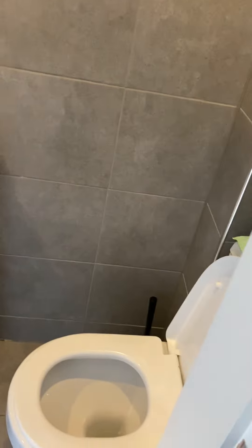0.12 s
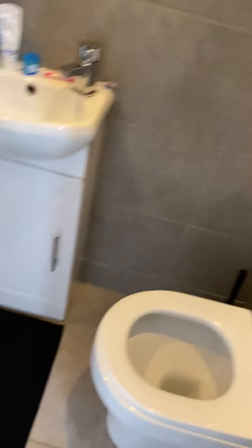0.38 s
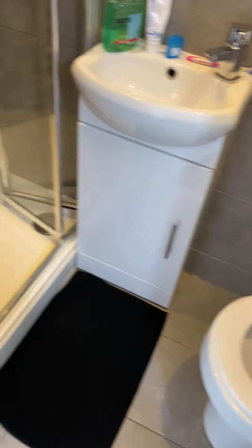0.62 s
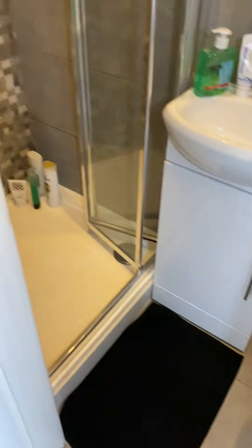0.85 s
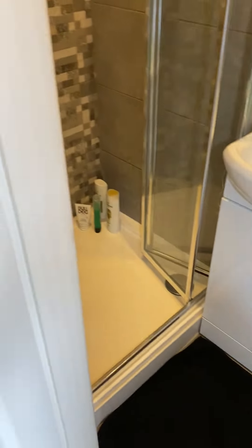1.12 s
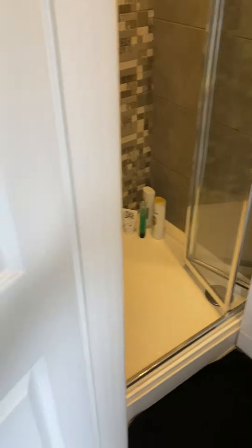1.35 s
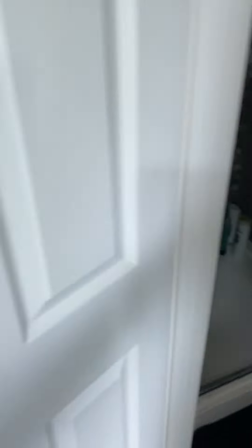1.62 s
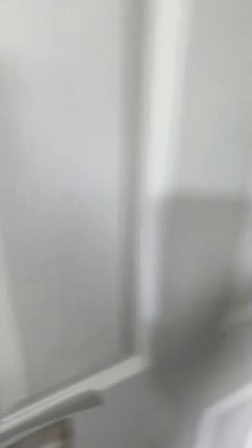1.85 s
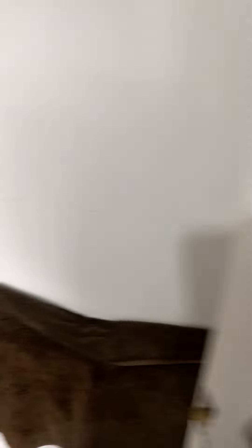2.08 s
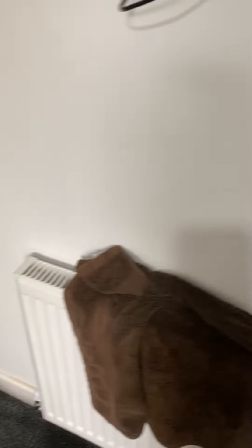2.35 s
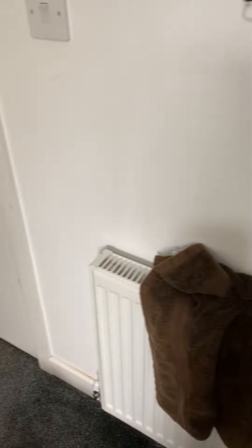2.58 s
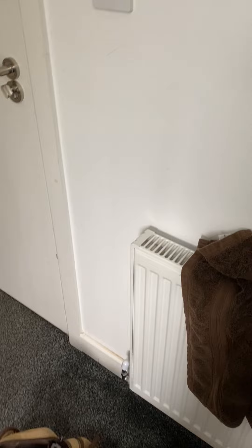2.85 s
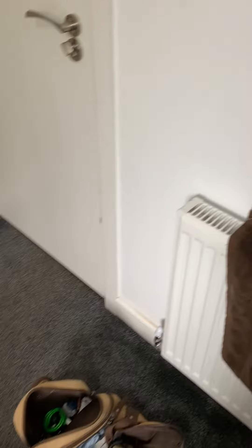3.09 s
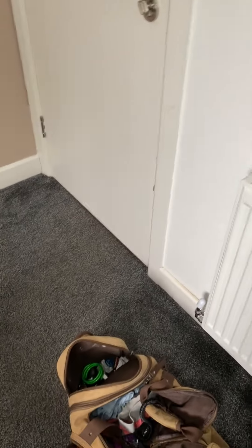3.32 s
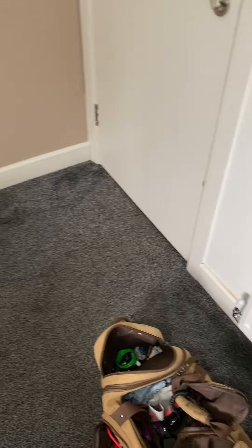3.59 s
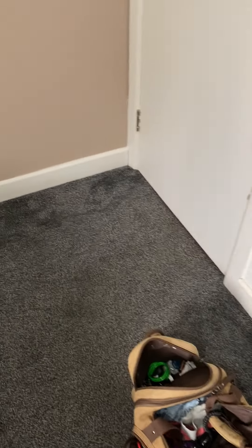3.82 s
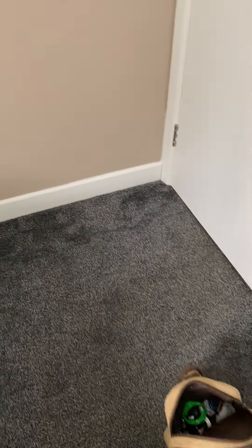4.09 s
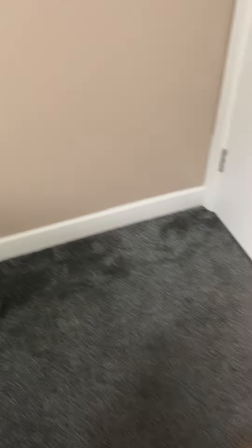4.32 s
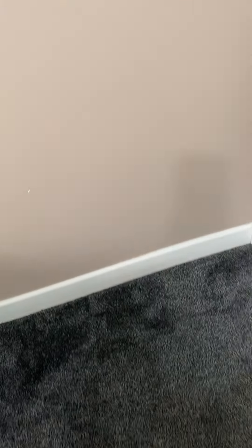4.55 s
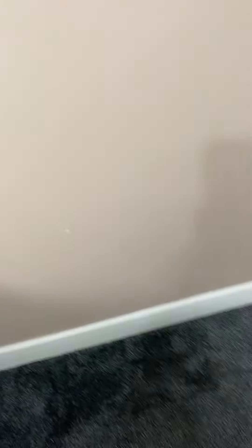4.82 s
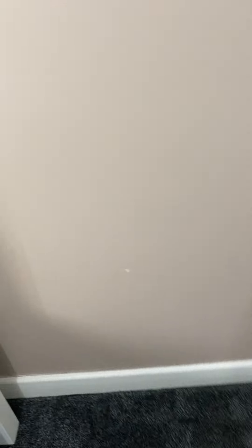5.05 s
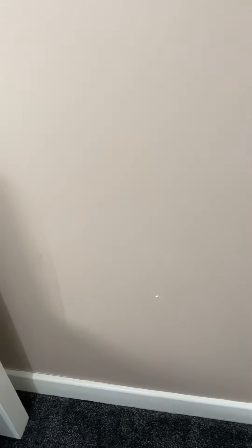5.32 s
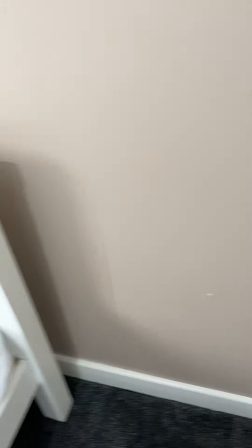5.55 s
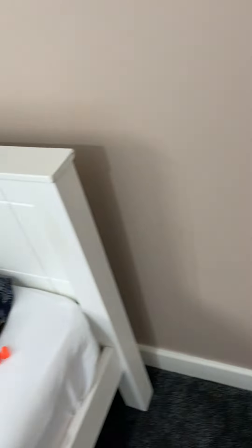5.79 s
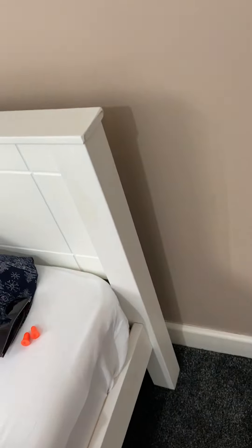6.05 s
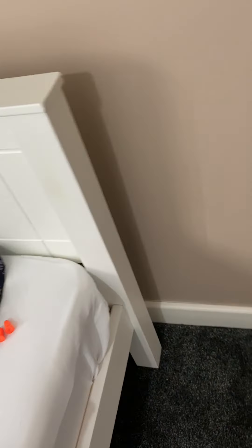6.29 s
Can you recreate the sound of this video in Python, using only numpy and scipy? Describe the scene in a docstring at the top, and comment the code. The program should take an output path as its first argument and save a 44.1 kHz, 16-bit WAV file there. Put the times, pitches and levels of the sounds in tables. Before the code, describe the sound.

A quiet indoor space with soft air hiss and a very faint rapid ticking from the lens motor, running in short spells. Tiny clicks and soft taps occur around 0.3-0.7 s. At 1.47 s a bright, dry switch click snaps out. From 2.05 s a panel door closes: a quick cluster of metallic latch clacks, a loud hollow wooden slam at 2.14, then deep dull thumps at 2.23, 2.31 and 2.40 with brief rattling. It settles into low floor rumble, faint cloth and a weak tap near 3.0. At 3.73 a latch clicks over a low thump, and at 3.90 a second heavy slam booms with a sharp clack, the low end fading past 4 s. Muffled footsteps thud around 4.9, 5.75 and 5.82. Small clicks, light knocks and short sole scrapes cluster at 5.25-5.5 and 6.26-6.4. Close stereo microphone, short room tail.

```python
"""Light switch, panel door and footsteps in a quiet house

A light switch clicks, a panel door is latched and slammed twice, and feet thud on boards under carpet.
Hard contacts are noise bursts that excite latch and door modes; soft blows swell into low floor booms.
Filtered noise gives the rattle, the shifting boards, the cloth, the dragged soles and the air.
A lens motor ticks inside the phone; a decaying noise tail is the room, heard at two microphone ports."""
import sys
import numpy as np
from scipy import signal
from scipy.fft import rfft, irfft, next_fast_len
from scipy.io import wavfile
from scipy.ndimage import uniform_filter1d, minimum_filter1d

SR = 44100
rng = np.random.default_rng(int(sys.argv[2]) if len(sys.argv) > 2 else 0)


def persist_wave(psi):
    """Save psi, clipped to +-1, as 16-bit WAV."""
    counts = np.round(np.clip(psi, -1, 1) * 32767).astype(np.int16)
    wavfile.write(sys.argv[1], SR, np.atleast_2d(counts).T)


def ratio(d):
    """dB to gain"""
    e = np.asarray(d, float) / 20
    return 10 ** e


N = 283122
T = np.arange(N) / SR  # time [s]

# Source levels are stated ahead of the microphone response and the limiter.
# Small hard parts (switch, latch, handle, buckles):
# (time [s], peak level [dB], colour [Hz], crack level re click [dB], chatter decay [s])
HARD_CONTACTS = [(.341, -45, 5800, -10, 0.0045), (.355, -38.5, 6050, -6, 0.0033),
                 (0.426, -44.5, 2000, 1.5, 0.0012), (1.202, -51, 3100, 8, 0.0032),
                 (1.446, -49, 2560, -22.5, 0.0071), (1.4703, -7.5, 3070, 2, 0.0036),
                 (1.4745, -23, 2300, -6, 0.0015), (1.874, -44, 5700, 6, 0.0011),
                 (2.046, -43, 2399, -1.5, 0.014), (2.062, -8.5, 1350, -0.5, 0.0032),
                 (2.079, -10.5, 1240, -3.5, 0.0043), (2.092, -11.5, 2540, 2.5, 0.0023),
                 (2.135, -6.5, 1217, -23, .005), (3.371, -41.5, 3140, 6, .005),
                 (3.642, -48, 2016, -4.5, 0.018), (3.7298, -21, 2760, 1.5, 0.0029),
                 (3.759, -28.5, 2670, -26, 0.0037), (3.885, -34, 2800, -6, .012),
                 (3.901, -7.5, 2730, 0.5, 0.0038), (3.918, -12, 2830, 1.5, 0.0093),
                 (4.32, -41.5, 2200, 10, 0.0015), (4.382, -46.5, 3800, 0.5, 0.013),
                 (4.907, -44, 5450, 6.5, .0028), (5.007, -37.5, 3350, 8.5, 0.0051),
                 (5.235, -43, 4190, -9.5, .0064), (5.255, -36.5, 6300, -4, .0043),
                 (5.371, -22, 2200, 5.5, 0.0033), (5.386, -36, 1490, -9, 0.006),
                 (5.455, -38, 5500, 7, 0.0057), (5.465, -28.5, 1765, -1.5, 0.0033),
                 (6.263, -24.5, 1730, -6.5, 0.0046), (6.272, -36.5, 4900, -29, 0.021),
                 (6.298, -37.5, 2620, -11, .004), (6.35, -37.5, 2640, -12, 0.0042)]
# Blows on door panels and furniture: (time [s], peak level [dB], hardness [Hz], chatter decay [s])
PANEL_KNOCKS = [(1.474, -28.5, 1150, .008), (2.07, -20.5, 420, 0.033), (2.134, -8, 1140, 0.0021),
                (2.14, -5, 537, 0.0028), (2.24, -28, 500, 0.018), (2.31, -25, 610, 0.0078),
                (2.399, -39, 500, 0.0083), (3.008, -41.5, 640, 0.0013), (3.734, -23.5, 356, 0.017),
                (3.904, -7.5, 716, 0.0014), (3.915, -9.5, 374, 0.021), (5.011, -49, 399.4, 0.0087),
                (5.284, -37.5, 910, 0.0024), (5.318, -35, 580, .007), (5.349, -36, 570, 0.0075),
                (5.473, -30.5, 560, 0.0036), (5.661, -44, 368, .02), (5.722, -49.5, 509, 0.042),
                (5.768, -49, 626, 0.0013), (6.045, -49, 550, .0059), (6.267, -33.5, 677, 0.008),
                (6.347, -35, 560, 0.0036)]
# Soft blows into floor and door leaf:
# (time [s], peak level [dB], boom frequency [Hz], t60 [s], swell time [s])
SOFT_BLOWS = [(0.649, -48, 284, 0.013, 0.0018), (0.68, -51.5, 496, 0.013, 0.0015),
              (0.702, -42, 340, 0.014, 0.00088), (1.611, -42.5, 179.9, .2, 0.013),
              (1.619, -43.5, 261.6, .15, .008), (1.93, -22, 49.4, 1, 0.24),
              (2.069, -10.5, 75.86, 0.63, 0.044), (2.142, -1.5, 75.6, 0.49, .009),
              (2.151, -22, 268.4, 0.24, 0.014), (2.227, -10.5, 70.1, 0.45, 0.008),
              (2.31, -6.5, 78.8, 0.18, 0.012), (2.401, -9.5, 79.05, 0.18, 0.0061),
              (2.319, -22.5, 319, 0.13, 0.0023), (2.371, -27.5, 449.4, 0.05, 0.0018),
              (2.413, -20, 216.2, 0.1, 0.0062), (2.481, -27.5, 77.6, 0.2, .01),
              (3.01, -37, 106.7, 0.87, 0.0046), (3.017, -37.5, 212.2, 0.24, 0.0025),
              (3.34, -37.5, 58, 0.57, .012), (3.74, -8, 55.1, 0.35, 0.014),
              (3.752, -19.5, 123.8, 0.76, 0.0021), (3.848, -24.5, 59.04, 0.42, 0.008),
              (3.907, -3.5, 57.75, 0.16, 0.024), (3.909, -10, 266.4, 0.28, 0.0057),
              (3.917, -4, 106.8, 0.32, 0.0084), (3.933, -16.5, 194.7, 0.59, 0.0068),
              (3.992, -15.5, 47.2, 1, 0.015), (4.104, -29, 60, 0.32, 0.0097),
              (4.924, -25, 53.8, 0.93, 0.026), (5.188, -41.5, 191.5, 0.085, 0.0078),
              (5.369, -33, 82.5, 0.061, 0.008), (5.473, -24.5, 221, 0.036, 0.0042),
              (5.492, -25.5, 77.2, 0.41, 0.0062), (5.653, -45, 379, 0.071, 0.012),
              (5.699, -49.5, 486.5, 0.11, 0.0069), (5.745, -26, 52.7, 0.52, 0.024),
              (5.822, -25.5, 50.2, 0.4, 0.065), (6.104, -32, 170.8, 0.28, 0.017),
              (6.20, -42.5, 178, 0.11, 0.0092), (6.352, -39.5, 187.7, 0.8, 0.023),
              (6.406, -29.5, 127.7, 0.27, 0.0074)]
# Door panel modes: (frequency [Hz], level [dB], t60 before the damping factor [s])
DOOR_MODES = [(240.1, 9, 0.23), (333.6, -1.5, 0.16), (465, -2.5, 0.22), (560, -7.5, 1), (668.4, 6.5, 0.054),
              (778.3, -14, 1), (795, -15, 0.15), (900, -10, 0.072), (1030, 0.5, 0.25), (1095, -8.5, 0.097),
              (1180, 2, 0.2), (1395, -53, 0.097)]
# Latch modes: (frequency [Hz], level [dB], t60 before the damping factor [s])
LATCH_MODES = [(1000, -6, .04), (1190, -2, .05), (1750, -4, .04), (2100, -4, .05), (2240, -7, .035),
               (2520, -6, .035), (2762, -2, .045), (3241, -4, .04), (3736, -2, .045), (4856, -1, .06),
               (5170, 0, .06), (5800, -6, .04), (6282, -6, .035)]
# Loose latch parts rattling while the door leaf shudders:
# (time [s], peak level [dB], 20 dB rise time [s], 20 dB fall time [s])
LATCH_RATTLES = [(2.17, -30, .03, 0.12), (2.36, -49.5, .15, 0.14), (3.8, -52.5, 0.037, 0.26),
                 (3.96, -37, .03, 0.19)]
# Weight shifting on the boards as the walker moves: (time [s], rumble level [dB])
WEIGHT_SHIFT = [(0, -71.5), (.9, -65), (1.2, -57.5), (1.75, -54.5), (2.0, -42), (2.5, -36), (2.7, -59),
                (3.0, -45), (3.4, -41), (3.55, -45), (4.15, -37), (4.5, -41.5), (4.75, -54.5), (5.05, -48),
                (5.3, -48), (5.55, -43), (5.95, -48), (6.15, -43.5), (6.42, -52.5)]
# Sweeps of cloth: (time [s], peak level [dB], 20 dB rise time [s], 20 dB fall time [s])
CLOTH_SWEEPS = [(2.7, -56.5, 0.43, 0.36), (2.815, -57, 0.07, 0.027), (3.49, -60, .3, 0.067),
                (3.71, -63, .15, 0.23), (4.35, -62, .3, 0.27), (5.05, -62.5, .3, .4),
                (5.32, -54.5, .06, 0.1), (5.45, -56, .08, 0.17), (5.9, -69, 0.063, 0.074),
                (6.3, -57, .15, 0.13)]
# Spectrum of cloth hiss: (frequency [Hz], relative density [dB per Hz])
CLOTH_SPECTRUM = [(710, -61), (1200, -7.5), (5090, -12), (6600, -3.5), (7290, -25), (8060, -4.5),
                  (10500, -12), (12200, -10.5), (13000, -43)]
# Soles dragged on carpet: (time [s], peak level [dB], 20 dB rise time [s], 20 dB fall time [s])
SOLE_DRAGS = [(1.95, -76, 1, 0.86), (2.7, -65, 1, 0.34), (3.49, -70, 0.21, 0.31), (5.32, -45, 0.047, 0.17),
              (5.44, -47, 0.055, 0.099), (5.72, -85.5, 0.068, 0.07), (6.08, -75.5, 0.052, .15),
              (6.4, -50, 0.24, 0.18)]
# Runs of the lens motor: (start [s], length [s], first level [dB], last level [dB])
LENS_RUNS = [(0.194, .078, -59, -46), (0.408, 0.1, -45, -53.5), (2.315, .15, -51, -63),
             (2.852, 0.15, -59.5, -47), (2.984, 0.19, -52, -49.5), (3.202, 0.18, -46, -74),
             (4.424, 0.23, -57.5, -73.5), (4.947, 0.35, -65, -51.5), (5.974, .08, -63.5, -50),
             (6.056, .19, -49, -59.5)]
# Resonances of the lens body: (frequency [Hz], width before scaling [Hz], drive level [dB])
LENS_RESONANCES = [(5800, 1500, 8), (9900, 1800, 18.5), (11600, 2200, 15.5), (14800, 900, 8)]
# Spectrum of the air noise: (frequency [Hz], relative density [dB per Hz])
AIR_SPECTRUM = [(18, 1.5), (30, 4.5), (80, 9), (212, 15.5), (336, -7), (709, -5), (871, -102.5),
                (1700, -13), (5410, -52.5), (6640, -3.5), (7360, -12), (8810, 13), (14000, -65.5)]
# Decay of the room: (frequency [Hz], t60 [s])
ROOM_DECAY = [(100, 0.96), (250, 0.63), (600, 0.063), (1500, 0.35), (4000, 0.26), (10000, 0.49)]
# Microphone response: (frequency [Hz], gain [dB])
MIC_RESPONSE = [(25, -28.5), (45, -3.5), (6000, 1), (10000, -12.5), (12500, -17.5), (15500, -24.5),
                (16500, -64)]
# Phase between the ports: (frequency [Hz], lead of left over right [rad])
PORT_PHASE = [(150, 0), (1000, -.5), (2000, .2), (4200, .9), (5300, 1.2), (7250, 3.14), (10000, 6.2),
              (13200, 9.4), (15700, 12.6)]
# Gain of the sound not shared by the ports: (frequency [Hz], gain [dB])
UNSHARED_GAIN = [(60, -30), (150, -22), (300, -9), (600, -3), (1500, -6), (3000, -1), (5000, -5),
                 (7200, -20), (12000, -10)]
# Level between the ports: (frequency [Hz], left minus right [dB])
PORT_BALANCE = [(60, .4), (150, .7), (300, 3.3), (1200, 2.4), (2500, .4), (12000, -.5)]


def hits():
    """Impact excitation: contacts drive the modes of small metal parts; gives near and room-feeding sound."""
    room_db, ring_db = -25.5, -2.5
    out, t = np.zeros((2, N)), T[:int(.3 * SR)]
    for s, db, hz, crack_db, chatter_s in HARD_CONTACTS:
        metal = ring(LATCH_MODES, 1, t, .4)
        for track, share_db, contact in zip(out, (0, room_db), contacts(t, chatter_s)):
            ringing = signal.fftconvolve(contact, metal)[:len(t)]
            struck = unit(contact) + ratio(ring_db) * unit(ringing)
            # the size of the part sets the colour; a broad crack rides on top
            crack = unit(steep(contact, 4500, 8800))
            click = unit(steep(struck, hz, hz)) + ratio(crack_db) * crack
            add(track, s, click, db + share_db)
    return out


def knocks():
    """Contact stiffness: hardness sets the band in which a blow excites heavily damped panel modes."""
    room_db, panels_db = -22.5, 2.5
    out, t = np.zeros((2, N)), T[:int(.3 * SR)]
    for s, db, hz, chatter_s in PANEL_KNOCKS:
        panels = ring(DOOR_MODES, .082, t, .55)
        # wood gives little treble, and a hard blow little bass
        wood = signal.butter(1, .92 * hz, fs=SR, output="sos")
        hardness = signal.butter(1, [.27 * hz, 1.2 * hz], "band", fs=SR, output="sos")
        for track, share_db, contact in zip(out, (0, room_db), contacts(t, chatter_s)):
            ringing = signal.fftconvolve(contact, panels)[:len(t)]
            knock = unit(steep(contact, hz, hz)) + ratio(panels_db) * unit(ringing)
            knock = signal.sosfilt(hardness, signal.sosfilt(wood, knock))
            add(track, s, knock, db + share_db)
    return out


def thuds():
    """Modal decay: a soft push swells into one low boom with weaker, shorter partners above it."""
    out, t = np.zeros(N), T[:int(.7 * SR)]
    for s, db, hz, t60, swell_s in SOFT_BLOWS:
        modes = [(hz, 0, t60), (1.1 * hz, -9, .8 * t60),
                 (1.45 * hz, -12, .6 * t60), (2.1 * hz, -14, .47 * t60)]
        boom = ring(modes, 1, t, .46)
        swell = 1 - np.exp(-t / max(swell_s, .0005))
        add(out, s, boom * swell, db)
    return out


def rattle():
    """Repeated impact: a dense run of tiny uneven blows excites the latch and the door panels."""
    impacts = rng.standard_normal(N) * ratio(1.7 * walk(150))
    t = T[:int(.2 * SR)]
    metal = ring(LATCH_MODES, .4, t, .25)
    panels = ring(DOOR_MODES, .11, t, .34)
    panel_sound = ratio(6) * unit(signal.fftconvolve(impacts, panels)[:N])
    impact_sound = unit(steep(impacts, 2000, 3300))
    metal_sound = ratio(-9) * unit(signal.fftconvolve(impacts, metal)[:N])
    return (panel_sound + impact_sound + metal_sound) * swells(LATCH_RATTLES)


def boards():
    """Sustained resonance: shifting weight keeps the floor sounding; the creak follows the rumble weakly."""
    rumble_db = weight_db()
    creak_db = -65 + .51 * (rumble_db + 50)  # -65 dB at a rumble of -50 dB
    noise = rng.standard_normal((2, 2, N))
    rumble = steep(noise[0], 50, 40)
    creak = steep(noise[1], 240, 60) + .54 * steep(noise[1], 300, 250)
    rumble = unit(rumble) * ratio(rumble_db + 1.5 * walk(6.2))
    return rumble + unit(creak) * ratio(creak_db + 1.2 * walk(12))


def cloth():
    """Friction noise: grainy hiss, modulated at random and raised by each sweep of cloth."""
    hiss = ratio(-69.5) + swells(CLOTH_SWEEPS)
    return colour(CLOTH_SPECTRUM) * hiss * ratio(.78 * walk(85) + 1.5 * walk(9))


def soles():
    """Friction noise: a duller scrape, raised by each drag and slightly by the weight on the boards."""
    idle_db = -74.5 + .15 * (weight_db() + 50)  # -74.5 dB at a rumble of -50 dB
    drag = ratio(idle_db) + swells(SOLE_DRAGS)
    scrape = steep(rng.standard_normal((2, N)), 670, 440)
    return unit(scrape) * drag * ratio(.6 * walk(40) + 4.1 * walk(7))


def lens():
    """Periodic excitation: each motor cycle drives the body by a brief buzz, then a shorter tick."""
    cycle_hz, start_s = 59.94, .009
    tick_delay_s, odd_advance_s = .0064, .0006
    idle_db, repeat_share = -70.5, .8
    cycle = np.floor((T - start_s) * cycle_hz)
    # every other cycle comes early
    since = T - start_s - cycle / cycle_hz + odd_advance_s * (cycle % 2)
    buzz = (since > 0) * np.exp(-(np.abs(since - .0008) / .001) ** 1.5)
    later = since - tick_delay_s
    tick = (later > 0) * np.exp(-np.abs(later) / .0003)
    # part of the grain is the same in every cycle
    same = rng.standard_normal(SR // 50)[(since.clip(0) * SR).astype(int)]
    grain = repeat_share * same + (1 - repeat_share) * rng.standard_normal(N)
    drive = grain * (buzz + 1.8 * tick + .1)
    body = sum(ratio(db) * steep(drive, hz, .88 * width) for hz, width, db in LENS_RESONANCES)
    effort = ratio(idle_db)
    for s, length_s, first_db, last_db in LENS_RUNS:
        running = (T > s) * (T < s + length_s)
        effort = effort + running * ratio(np.interp(T, [s, s + length_s], [first_db, last_db]))
    return unit(body) * effort * np.array([[1], [.4]])  # shared, unshared


def room(far):
    """Diffuse decay: noise dies band by band; the second row is the part the ports do not share."""
    t = T[:SR]
    hz_known, t60_known = np.transpose(ROOM_DECAY)
    tail = 0
    for hz in 60 * 2 ** np.arange(0, 8.1, .5):  # half-octave bands
        t60 = np.interp(np.log(hz), np.log(hz_known), t60_known)
        tail = tail + band(rng.standard_normal((2, SR)), hz, hz / 2.5) * ratio(-60 * t / t60)
    # strong early reflections from the near walls, then the even decay
    tail = tail * (1 - np.exp(-t / .0036)) * (1 + np.exp(-t / .015))
    return signal.fftconvolve(far[None], tail, axes=1)[:, :N]


def air():
    """Stationary noise: a steady spectrum fills the background."""
    return colour(AIR_SPECTRUM) * ratio(-68.5)


def ports(both):
    """Interaural-like differences: phase and level between two ports spread shared and unshared sound."""
    edge = SR // 10  # mirrored margin against wrap-around
    size = next_fast_len(N + 2 * edge)
    padded = np.pad(both, ((0, 0), (edge, edge)), mode="reflect")
    shared, apart = rfft(padded, size) * ratio(over_hz(MIC_RESPONSE, size))
    apart = apart * ratio(over_hz(UNSHARED_GAIN, size))
    # each port takes half of the phase and level difference
    lead = np.exp(1j * over_hz(PORT_PHASE, size) / 2) * ratio(over_hz(PORT_BALANCE, size) / 2)
    left_right = np.array([(shared + apart) * lead, (shared - apart) / lead])
    return irfft(left_right, size)[:, edge:edge + N]


def contacts(t, chatter_s):
    """Micro-impacts: near by, a burst of them swells and dies; the room receives one impulse."""
    u = t / max(chatter_s, .0005)
    burst = rng.standard_normal(len(t)) * np.exp(-u) * (1 - np.exp(-2 * u))
    return burst, 1. * (t == 0)


def ring(modes, damp, t, scatter):
    """Modal superposition: decaying sines with fresh strengths and slightly shifted pitch."""
    hz, db, t60 = np.transpose(modes)[:, :, None]
    chance = scatter * rng.standard_normal((len(modes), 2)).T[:, :, None]
    sway = np.sin(2 * np.pi * hz * (1 + .029 * chance[0]) * t)
    return np.sum(ratio(db + 3 * chance[1] - 60 * t / (damp * t60)) * sway, axis=0)


def weight_db():
    """Quasi-static loading: rumble level of the boards over time."""
    return np.interp(T, *np.transpose(WEIGHT_SHIFT))


def swells(table):
    """Exponential envelopes: events gain and lose 20 dB in their rise and fall times."""
    gain = 0
    for s, db, rise_s, fall_s in table:
        before, after = (s - T) / max(rise_s, .005), (T - s) / max(fall_s, .005)
        gain = gain + ratio(db - 20 * np.where(T < s, before, after))
    return gain


def walk(rate):
    """Random modulation: levels held 1 / rate s, smoothed by two moving averages."""
    k = int(SR / rate)
    held = np.repeat(rng.standard_normal(N // k + 1), k)
    return 1.32 * uniform_filter1d(uniform_filter1d(held, k), k)[:N]


def colour(table):
    """Spectral shaping: two unrelated noises of unit rms with the given spectrum."""
    white = rfft(rng.standard_normal((2, N)))
    return unit(irfft(white * ratio(over_hz(table, N)), N))


def over_hz(table, size):
    """Logarithmic frequency scale: interpolates a (frequency [Hz], value) table on transform bins."""
    hz, value = np.transpose(table)
    return np.interp(np.log(np.arange(size // 2 + 1) * SR / size + 1), np.log(hz), value)


def band(x, hz, width):
    """Simple resonance: a two-pole band-pass."""
    return signal.lfilter(*signal.iirpeak(min(hz, .45 * SR), max(hz / width, .3), SR), x)


def steep(x, hz, width):
    """Cascaded resonance: the band-pass applied twice."""
    return band(band(x, hz, width), hz, width)


def unit(x):
    """Normalization: scales the effective value (rms) to one."""
    return x / np.sqrt(np.mean(x ** 2, axis=-1, keepdims=True))


def add(track, s, sound, db):
    """Linear superposition: lays a sound at a time with a given peak level."""
    i = int(s * SR)
    sound = sound[:N - i]
    track[i:i + len(sound)] += sound * ratio(db) / np.max(np.abs(sound))


def scene():
    """Superposition: direct sound, room tail and background meet at the ports."""
    hit_near, hit_far = hits()
    knock_near, knock_far = knocks()
    low = thuds()
    near = hit_near + knock_near + low + rattle()
    direct = np.stack([near, np.zeros(N)])  # reaches both ports alike
    reverberant = room(hit_far + knock_far + ratio(-44.5) * low)
    return ports(direct + reverberant + boards() + cloth() + soles() + lens() + air())


def band_limit(x):
    """A steep low-pass at the top of the band."""
    return signal.sosfilt(signal.butter(12, 16970, fs=SR, output="sos"), x)


def record(dry):
    """Peak limiting: the gain falls with the slams and recovers slowly."""
    window, release_s, ceiling = 221, .03, .9  # window in samples
    peak = -minimum_filter1d(-np.max(np.abs(dry), axis=0), window)
    hold = signal.lfilter([1 / (release_s * SR)], [1, 1 / (release_s * SR) - 1], peak)
    gain = np.minimum(1, ceiling / np.maximum(peak, hold).clip(1e-6))
    mix = dry * uniform_filter1d(gain, window)
    return band_limit(mix)


dry = scene()
out = record(dry)
persist_wave(out)
```